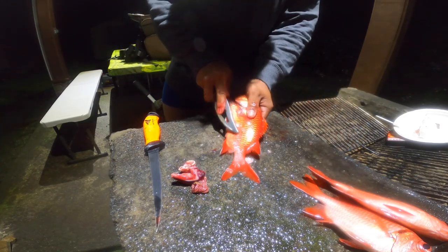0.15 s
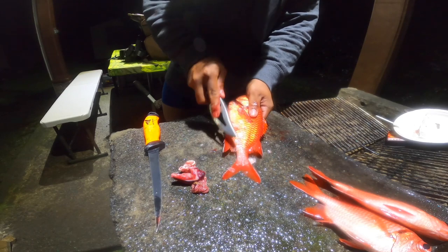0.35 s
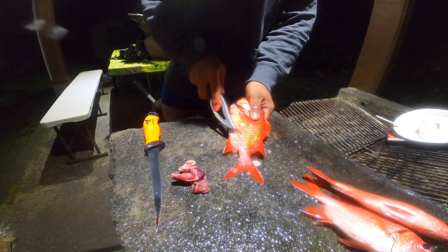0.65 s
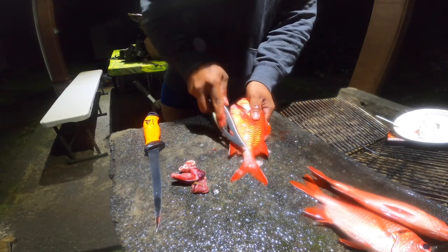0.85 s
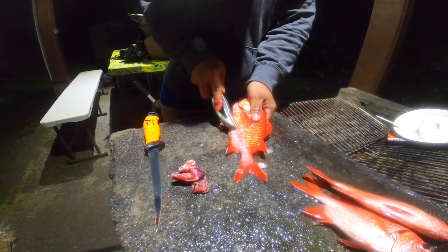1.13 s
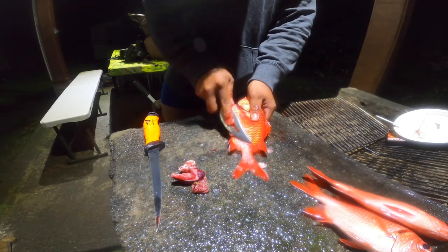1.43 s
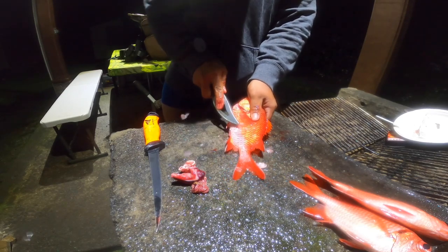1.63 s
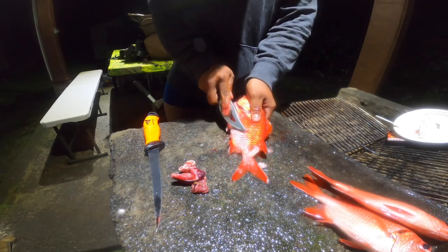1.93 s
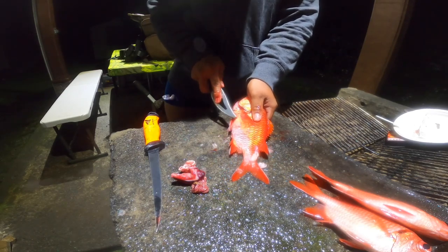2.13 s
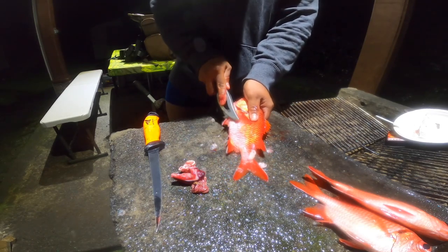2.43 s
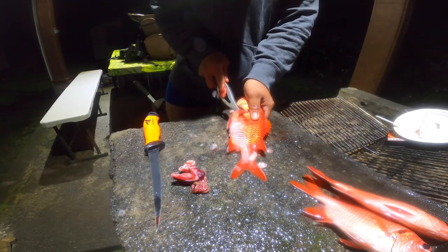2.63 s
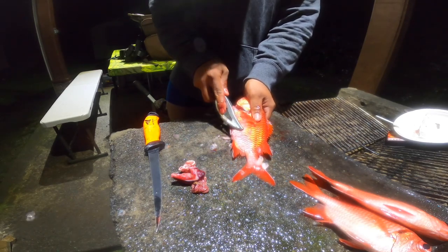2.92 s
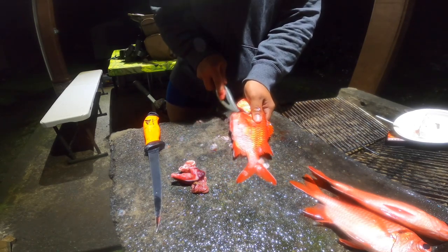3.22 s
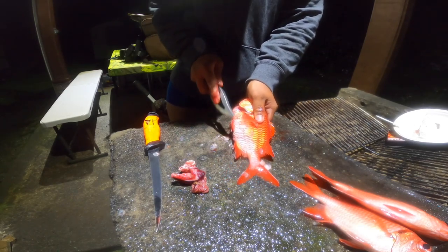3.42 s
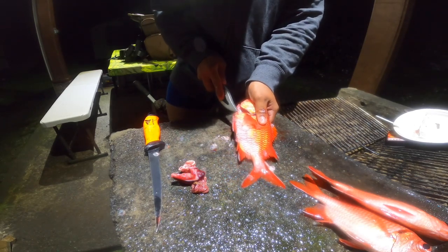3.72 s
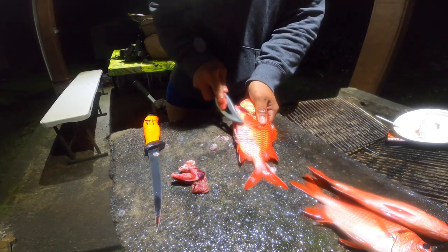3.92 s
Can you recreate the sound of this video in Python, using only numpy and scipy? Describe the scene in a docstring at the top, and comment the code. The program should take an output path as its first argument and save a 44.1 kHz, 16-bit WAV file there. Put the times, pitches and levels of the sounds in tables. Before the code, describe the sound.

Outdoors at night, a fish is scaled right by the microphone: dry, bright, crunchy rasps made of many tiny snaps, with slight blade ring and fleshy thuds. Strokes repeat evenly, densest in the middle, and the last is lighter and thinner. Faint gliding frog peeps and insect hiss sit far behind, and low wind buffeting swells suddenly in the last second.

```python
"""Scaling a fish at night

A steel blade rakes hard scales off a fish on a concrete slab outdoors, close to a microphone with two ports.
Each scale that pops is a noise burst that rings fish, blade, scale and edge as resonators; countless small
slips, as spiky noise through the same modes, rasp under the stroke. Slab and posts echo it briefly.
Far tree frogs whistle gliding sines over a blurred chorus, and gusts rumble as shaped noise."""
import sys
import numpy as np
from scipy import signal
from scipy.fft import rfft, irfft, next_fast_len
from scipy.io import wavfile
from scipy.ndimage import uniform_filter1d, map_coordinates

SR = 44100
rng = np.random.default_rng(int(sys.argv[2]) if len(sys.argv) > 2 else 0)


def invert_db(level):
    """Linear amplitude ratio for a level in decibels (20 dB per decade), elementwise."""
    return 10 ** (np.asarray(level, dtype=float) / 20)


def to_wav(sig):
    """Store sig (one row per channel, or 1-D mono) as 16-bit WAV at the path in sys.argv[1].

    Samples outside -1..1 are clipped; the rate is SR.
    """
    pcm = np.clip(np.atleast_2d(sig), -1, 1) * 32767
    pcm = np.round(pcm).astype(np.int16)
    wavfile.write(sys.argv[1], SR, pcm.T)  # frames by channels


N = 179237  # samples


def unit(x):
    """Normalisation: scales x to rms 1."""
    return x / np.sqrt(np.mean(x ** 2) + 1e-20)


def along(points, hz):
    """Interpolation of (f, value) points on a logarithmic frequency axis."""
    f, v = np.transpose(points)
    return np.interp(np.log(hz + 1), np.log(f + 1), v)


def curves(rows):
    """Linear interpolation in time: one value per sample for each column after t."""
    s, *columns = np.transpose(rows)
    return [np.interp(np.arange(N) / SR, s, column) for column in columns]


def wobble(rate):
    """Slow random modulation: a smooth curve through rate random knots a second."""
    knots = rng.standard_normal(int(N * rate / SR) + 4)
    return map_coordinates(knots, [np.arange(N) * rate / SR])


def filtered(x, response):
    """Linear filtering: the spectrum of x times a complex response of frequency."""
    m = next_fast_len(N + SR // 2)
    return irfft(rfft(x, m) * response(np.fft.rfftfreq(m, 1 / SR)), m)[..., :N]


def ringing(x, modes):
    """Modal superposition: rows of x drive causal resonances of alternating sign."""
    size = next_fast_len(x.shape[-1] + SR // 20)
    f = np.fft.rfftfreq(size, 1 / SR)
    response = 0
    for k, (centre, width, db) in enumerate(modes):
        resonance = 1j * f * width / (centre * centre - f * f + 1j * f * width)
        response = response + (-1) ** k * invert_db(db) * resonance
    return irfft(rfft(x, size) * response, size)[..., :x.shape[-1]]


def rush(spectrum, alike):
    """Partial coherence: stereo noise of rms 1, its mid and side weighted to give the left-right likeness."""
    turn = lambda hz: np.arccos(np.clip(along(alike, hz), -1, 1)) / 2
    shape = lambda hz: invert_db(along(spectrum, hz)) * [np.cos(turn(hz)), np.sin(turn(hz))]
    mid, side = filtered(rng.standard_normal((2, N)), shape)
    return unit(np.array([mid + side, mid - side]))


def rasp(modes, clumps, spread_db):
    """Stick-slip friction: tiny slips as spiky noise in clumps, ringing one part's modes, at rms 1."""
    spikes = invert_db(spread_db * rng.exponential(size=N)) * rng.standard_normal(N)
    return unit(ringing(spikes * clumps, modes))


def cracks(s, peak_db, modes, rise, fall, snap):
    """Impulsive excitation: noise bursts swell and die over rise and fall (s), with a snap, and ring the modes."""
    t = np.arange(-SR // 200, SR // 25) / SR
    envelope = np.exp(np.where(t < 0, t / rise, -t / fall))
    bursts = rng.standard_normal((len(s), len(t))) * envelope + snap * (t == 0)
    rings = ringing(bursts, modes)
    tops = np.sqrt(uniform_filter1d(rings ** 2, size=48, axis=1).max(axis=1))  # loudest short-time rms
    levelled = rings * (invert_db(peak_db) / tops)[:, None]
    at = np.round((s[:, None] + t) * SR).astype(int).clip(0, N - 1)
    return np.bincount(at.ravel(), levelled.ravel(), N)


# resonances of each part: f/Hz, width/Hz, relative level/dB
BODY = [(344, 280, -4.5), (566, 226, 0)]  # the whole fish on the slab
FLESH = [(933, 1140, 0), (1037, 210, 7), (1298, 168, 4.5)]
BLADE = [(1851, 92, -5.5), (1600, 214, -25.5)]  # lower bending mode
BLADE_UPPER = [(1965, 110, 0), (2200, 200, -7)]  # upper bending mode
OVERTONE = [(3300, 150, -7), (3560, 220, 0)]  # overtone of the blade
SCALE = [(2600, 4500, -8.5), (4200, 2670, -0.5), (5287, 1345, 6), (5670, 696, 6.5), (7200, 600, -16.5)]
EDGE = [(7090, 290, 2), (8930, 1250, 5), (11900, 5300, -10), (13300, 3800, -33)]  # thin edge of the blade
# one table a stroke with its return: t/s, pressure as rasp level/dB, freedom of the blade to ring/dB,
# bite into the flesh/dB; small trims and swings follow in the function
STROKES = [
    [(0, -73, -8, 2), (0.13, -68, 13, 7), (0.164, -46, 12.5, -6.5), (0.216, -40, 15, 1.5),
     (0.293, -40, 5.5, 0.5), (0.338, -46, 9.5, -7), (0.378, -63, 2, 3), (0.45, -70, 10, 14),
     (0.529, -68, 5, -3)],
    [(0.578, -57, 18.5, 0), (0.609, -41.5, 19, -4), (0.704, -31.5, 9, -6), (0.75, -36, 10, -5),
     (0.791, -49, -1, -5), (0.822, -45.5, 13, 9), (0.855, -57.5, 9, 2.5), (0.953, -72.5, -6, -5)],
    [(1.033, -59.5, 11, -8), (1.066, -48, 21, 5), (1.097, -40, 14, 6), (1.166, -40.5, 7, 1),
     (1.226, -38, -1, -2.5), (1.279, -54, -6, 2), (1.415, -72, -3, -1)],
    [(1.509, -63.5, 17.5, -7), (1.53, -45.5, 25, 4.5), (1.564, -42.5, 21.5, -4), (1.604, -36.5, 11.5, 4),
     (1.693, -36.5, 4, 0.5), (1.724, -42, 12, -1.5), (1.769, -56, -6, -16), (1.828, -50, 2.5, -11),
     (1.901, -70.5, 8, 3)],
    [(1.983, -56, 4, -5), (2.005, -47, 16, -14), (2.042, -37, 0, 3), (2.099, -39, 6, 5),
     (2.174, -32, -2, -3), (2.21, -39, 8, 6), (2.245, -47.5, -9, -2), (2.333, -72.5, -13, -0.5)],
    [(2.413, -63, 2, -4), (2.477, -41, 3, 0), (2.521, -42.5, 13, 2.5), (2.547, -37, 8, -6),
     (2.617, -40, -2, 0), (2.673, -39.5, -7, -17), (2.705, -37, -1, -9), (2.764, -43, 15, 11),
     (2.797, -48.5, 1, -4), (2.858, -49.5, -5, -31), (2.908, -66, 5, 7)],
    [(3.078, -56, -2, 1), (3.104, -43.5, 6, -1), (3.186, -39, -2, -9), (3.258, -46, 6, -4),
     (3.291, -40, -12, -10), (3.342, -39.5, 10, -3), (3.395, -53, 11, -1), (3.524, -68.5, -2, 8)],
    [(3.651, -54.5, 9, -6), (3.68, -44.5, 8, -5), (3.702, -37.5, 6, 1), (3.768, -52, 14.5, -6),
     (3.84, -53, 19, -4), (3.866, -57, 13, -13), (3.943, -66, -13, 7), (4.06, -56.5, 5, 6)],
]
# how the blade is held: t/s, upper mode's share of the ring (0-1), overtone over the rasp/dB,
# edge over the rasp/dB (both before their swing with pressure)
GRIP = [(.2, 0, 9.5, 2), (.65, 0, 9.5, -2), (.8, 0.2, -4, 5), (1.1, 0, 11, -1), (1.25, 0.4, -3, -1),
        (1.55, 0.09, 7, -3), (1.7, 0.34, 1.5, 3), (2.03, 0.16, 7.5, 1), (2.2, 0.35, -0.5, 2.5),
        (2.55, 0.07, 5, -1.5), (2.77, 0.67, -1, -3.5), (3.15, 0.13, 2, -1), (3.3, 0.5, 0, 1.5),
        (3.7, 0.1, 0, -2.5), (3.85, 0.66, 7, 9.5)]
# where on the fish the blade works: t/s, usual scale pitch f/Hz, hollow of the belly over firm flesh/dB,
# body on the slab/dB
PLACE = [(.2, 3740, -1, -7), (.33, 3980, 13.5, -11), (.65, 3600, -0.5, -8), (1.15, 4100, 0.5, -14),
         (1.55, 4050, -3, -5), (1.7, 3800, -6.5, -12.5), (2.05, 4550, 3, -5), (2.2, 3800, 1.5, -26),
         (2.55, 4200, -2, -8), (2.76, 4200, -6, -2), (3.1, 4000, -8.5, -13), (3.35, 3630, -6, 0.5),
         (3.7, 4740, 6, -7)]


def rasping(clumps):
    """Friction-driven modes: slips excite every part, weighted by pressure, freedom and bite."""
    press_db, free_db, bite_db = curves(np.concatenate(STROKES))
    upper, overtone_db, edge_db = curves(GRIP)
    upper = np.clip(upper, .02, .98)
    body_db = curves(PLACE)[2]
    firm_db = press_db + 17  # pressure over a firm stroke
    blade = invert_db(press_db + free_db - 2.5)
    parts = ((invert_db(press_db + body_db + 0.94 * bite_db), BODY),  # the body takes most of the bite
             (invert_db(press_db + bite_db - 2.0), FLESH),
             (blade * np.sqrt(1 - upper), BLADE),
             (blade * np.sqrt(upper), BLADE_UPPER),
             (invert_db(press_db + 0.12 * firm_db + overtone_db), OVERTONE),  # pressure favours overtone and edge
             (invert_db(press_db), SCALE),
             (invert_db(press_db + 0.14 * firm_db + edge_db), EDGE))
    return sum(gain * rasp(modes, clumps, spread_db=2.5) for gain, modes in parts)


# scales popping off: t/s, snap level/dB, then over the snap: blade ring/dB, flesh thud/dB, edge sizzle/dB;
# small trims follow in cracking()
POPS = [(0.0844, -33.5, -12, -13, -12.5), (0.1532, -26, -5.5, -24, -11), (0.1669, -25, -10, -23, -19),
        (0.1771, -22.5, -16, -27, -23), (0.1947, -18.5, -1.5, -27, -7), (0.2294, -23, 11.5, -17, -2),
        (0.2662, -28, 10.5, -16, -20), (0.2775, -17, -6, -15, -28), (0.2866, -28, 3, 3, -20),
        (0.2946, -20.5, -3, -3, -17), (0.3028, -33, -14, 2, 8), (0.3094, -39, -9, 13, -2),
        (0.329, -16.5, -19, -4, -6.5), (0.345, -39, 3, 7, -8), (0.4192, -34.5, -17, -18, -7),
        (0.5412, -25.5, -38, -46, -10), (0.5493, -25.5, -29, -39, -12), (0.6012, -15, -12, -33, -10.5),
        (0.6105, -35, 13, -17, -14), (0.6254, -20.5, -14, -22, -21), (0.6338, -19, 2, -22, -19),
        (0.6545, -22, 9.5, -11, -1.5), (0.6626, -26.5, 13, -20, -18), (0.6782, -33, 20, -16, -13),
        (0.6929, -29.5, 18.5, -15, -15), (0.7061, -18, -11, -26, -20), (0.7282, -16, -1, -21, -9),
        (0.7358, -15, -1.5, -32, -3.5), (0.7471, -18.5, -5, -14, -4), (0.7702, -22.5, -6, -16, 0.5),
        (0.8102, -16.5, -6.5, -8, 2.5), (0.9962, -35, -14, -23, -15), (1.0109, -43, -12, -11, -3),
        (1.0634, -32.5, 8.5, -15, -8), (1.0826, -20, -8, -19, 0), (1.0956, -24, 3.5, -2.5, -20),
        (1.1109, -16.5, -2, -25, -23), (1.1247, -27, 12.5, 1.5, -16), (1.1395, -33, -3, 0, -11),
        (1.1483, -18, -3, -12, -37), (1.1556, -12.5, -10, -22, -8), (1.1628, -15.5, -3.5, -18, -8),
        (1.1751, -14, -6, -19, -5), (1.1908, -17, -12, -11.5, -14), (1.2104, -26, -0.5, -10, -9.5),
        (1.226, -13.5, -18, -26, -5), (1.2996, -35, -17, -4.5, -13), (1.3392, -39, -3, -7, -2),
        (1.5273, -31, 14.5, -10, -19), (1.536, -31, 5.5, -7, -15), (1.5547, -33.5, 17.5, -5, -7),
        (1.5689, -17, 6.5, -10, -10), (1.585, -21.5, 4, -11, -2.5), (1.5939, -27.5, 10, -9, 0.5),
        (1.6159, -25, -3, -2, 2.5), (1.6234, -15.5, -12, -14, -13), (1.6457, -22, 3, -17, -14),
        (1.6575, -22, -6, -10.5, -4), (1.6846, -17.5, -3, -5.5, -17), (1.6985, -14.5, -16, -24, -25),
        (1.7147, -22, -18, -24, -8), (1.7291, -17.5, -23, -28, 1.5), (1.8243, -28.5, -21, -11, -7),
        (1.83, -28, -33, -21, -14), (1.9262, -39.5, -9, -20, -2), (1.9925, -34, 11, -10, -7),
        (2.0005, -39, 19.5, -11, -18), (2.0107, -28, 10, -14, -21), (2.0154, -20, 7.5, -9, -1.5),
        (2.0234, -16.5, 3.5, -16, -9), (2.0321, -25, 10.5, -2, -6), (2.0443, -16, 0, -26, -6),
        (2.062, -15, -2.5, -22, -1.5), (2.0783, -17, -15, -19, -15), (2.0861, -22.5, -11, -13, 2),
        (2.0995, -26, -8, 2, -13), (2.1053, -33, -3, 0, -3), (2.1258, -18, 2, 0, -0.5),
        (2.1478, -19, -1, -17, -0.5), (2.1681, -17.5, -0.5, -26, -9), (2.1762, -21, -1, -9, -4),
        (2.1943, -18, -3, -19, -13), (2.2073, -19, 0.5, -9, -6), (2.2201, -19.5, -5, 2.5, -22.5),
        (2.4115, -42, -21, -29.5, -20), (2.4216, -40, -17, -23, -3), (2.4418, -36, -14, -5, -7),
        (2.461, -35, -5, -5, -13), (2.4751, -14, -5, -6, -9), (2.5035, -25, -8, -4, 0),
        (2.5246, -31, -9, -8, 8), (2.5315, -15, -13, -15, -8), (2.5371, -18.5, -13, -11, -15),
        (2.5457, -19, -5, -21, -21), (2.5611, -14.5, -20, -9, -6), (2.5909, -19, -16, -12, -10),
        (2.6003, -16.5, -26, -25, -3), (2.6158, -23, -4, -15, -13), (2.6407, -20, -7, -24, -9),
        (2.651, -17, -13, -22, -10), (2.6564, -18, -8, -11, -10), (2.6613, -12.5, -11, -33, -10),
        (2.6719, -46, -13, -20, -19), (2.6839, -53, -5, -17, 0), (2.6896, -41, -19, -27, -7),
        (2.6991, -22, -13, -7, -2), (2.7059, -15.5, -12, -8.5, -2.5), (2.7532, -30, 0, -7, -24),
        (2.8239, -33, -20, -27, -15), (2.8341, -33, -15, -17, -21), (2.8575, -29.5, -4.5, -23, -8.5),
        (3.0384, -30, -12, -22, -7), (3.086, -22, -26, -34, -23), (3.0973, -22, -3, -4.5, 5),
        (3.1417, -24.5, -5, -1.5, -16), (3.1515, -34, 4, 3, -12), (3.1735, -22, -0.5, -5, -14),
        (3.1893, -11, -13, -16.5, -7), (3.2008, -38, -6, -21, -16), (3.2306, -14, -13, -7.5, -4),
        (3.2422, -24, -4, -17, -18), (3.2773, -19, 1, -17, 5), (3.2885, -15.5, 0, -26, -16),
        (3.2982, -29.5, 9, 3, -5), (3.3075, -16.5, -3, -12, -1), (3.3194, -37, -11, -9, 1),
        (3.3293, -29, 10, 6, 2), (3.3595, -29, -3, -16, -16), (3.3754, -25, -2, -26, -14),
        (3.4137, -31, -19, -28, -12), (3.4489, -29.5, 2.5, -25, -30), (3.4771, -35.5, -16, -20, -5),
        (3.6068, -37.5, -14.5, -23, -7), (3.658, -39.5, -1, -2, 7.5), (3.6668, -29.5, -11, -8.5, 6.5),
        (3.6739, -24.5, 3.5, -4, -5), (3.6842, -28, -5, -13, 3.5), (3.6938, -20, 3, -10, 3),
        (3.7199, -24.5, -7, -16, -8), (3.7272, -29.5, 2, -12, 7), (3.7334, -37, 12, -6, 12),
        (3.7439, -30, 5, -8, 7.5), (3.7537, -42, 3, 3, 7), (3.7642, -33, 17, 4.5, 12.5),
        (3.7947, -18, 1, -30, -6), (3.8415, -43.5, 17, -9, -7), (3.894, -22, -16, -43, -49),
        (3.9101, -36.5, -6.5, -35, -9), (4.0308, -42, -6, -9, -18), (4.063, -30.5, -17, -13, -10)]
# small pops, a row each for ring, thud and sizzle: mean over the snap/dB, scatter/dB
SMALL_COLOUR = [(-11, 11.5), (-11, 11), (-13, 7)]
SMALL_POPS, SMALL_DB, SMALL_SPREAD_DB = 80, 6, 4.5  # how many, mean snap over the pressure, scatter
SCALE_SIZES = 0.094  # log spread of scale pitch


def pops():
    """Weighted random process: small pops crowd where pressure is high, beside the listed ones; each has a pitch."""
    press_db = curves(np.concatenate(STROKES))[0]
    crowd = np.cumsum(invert_db(.5 * press_db))
    chance = rng.standard_normal((SMALL_POPS, 4))
    mean_db, scatter_db = np.transpose(SMALL_COLOUR)
    at = np.searchsorted(crowd, crowd[-1] * rng.uniform(size=SMALL_POPS)).clip(0, N - 1)
    size_db = press_db[at] + SMALL_DB + SMALL_SPREAD_DB * chance[:, 0]
    small = np.column_stack([at / SR, size_db, mean_db + scatter_db * chance[:, 1:]])
    rows = np.vstack([POPS, small])
    usual_hz = np.interp(rows[:, 0], *np.transpose(PLACE)[:2])
    pitch_hz = usual_hz * np.exp(SCALE_SIZES * rng.standard_normal(len(rows)))
    return np.column_stack([rows, pitch_hz])


def cracking(popped):
    """Impulse response of coupled parts: each pop strikes flesh, both blade modes, scale and edge."""
    s, scale, ring, thud, sizzle, scale_hz = np.transpose(popped)
    s = s - .0006  # the burst's centre, this many s ahead of the listed time
    at = (s * SR).astype(int).clip(0, N - 1)
    share = np.clip(curves(GRIP)[0], .02, .98)[at]  # the grip shifts the ring between two bending modes
    hollow_db = curves(PLACE)[1][at, None]
    flesh = [(hz, width, db + side * hollow_db) for (hz, width, db), side in zip(FLESH, (0, .5, -.5))]
    lower_db = scale + ring - 1.2 + 10 * np.log10(1 - share)
    upper_db = scale + ring - 1.3 + 10 * np.log10(share)
    own = [(scale_hz[:, None], 500, 7)]  # every scale adds a pitch of its own
    out = cracks(s, scale + thud - 1.1, BODY + flesh, rise=0.0013, fall=0.0012, snap=0.93)
    out += cracks(s, lower_db, BLADE, rise=0.0016, fall=0.0019, snap=8.1)
    out += cracks(s, upper_db, BLADE_UPPER, rise=0.00086, fall=0.002, snap=1.74)
    out += cracks(s, scale - 1.4, own + SCALE, rise=0.00072, fall=0.0012, snap=1.95)
    return out + cracks(s, scale + sizzle - .8, EDGE, rise=0.00011, fall=0.00077, snap=1.6)


PORTS = [(300, -0.5), (1300, -1.5), (2400, 1.5), (4400, 0), (8100, -5.5), (15000, -13)]  # level balance of the ports: f/Hz, left over right/dB
DIRECT = [(2000, .99), (3000, .9), (5500, .78), (9500, .75), (13500, .4)]  # likeness of the ports: f/Hz, left-right likeness (0-1)
LAG = [(300, 0.053), (1500, 0.54), (2700, 0.93), (5200, 0.63), (6500, 1.67), (9000, 1.32), (11600, 0.75),
       (14000, 1.5)]  # phase between the ports: f/Hz, left behind right/rad
SHIFT = [(0, 0.77), (.7, 0.85), (1.15, 0.43), (1.6, 0.33), (2.1, 0.59), (2.6, 0.47), (3.2, 0.51),
         (3.6, 0.05), (4.06, 1)]  # drift of that phase: t/s, added lag of the left treble/rad


def at_ports(work, scattered):
    """Interaural-like differences: work from the right reaches the left later, duller, partly by hands and slab."""
    half = lambda hz: invert_db(along(PORTS, hz) / 2) * np.exp(-.5j * along(LAG, hz))
    left = filtered(work, lambda hz: half(hz) * along(DIRECT, hz))
    left += filtered(scattered, lambda hz: half(hz) * np.sqrt(1 - along(DIRECT, hz) ** 2))
    treble = filtered(left, lambda hz: 1 / (1 + (7000 / (hz + 1)) ** 8))
    # the hand's place changes the path
    shifted = np.real(signal.hilbert(treble) * np.exp(-1j * curves(SHIFT)[0]))
    left += shifted - treble
    return np.array([left, filtered(work, lambda hz: 1 / half(hz))])


YARD = [(300, 0.037), (2000, 0.27), (5000, 0.099), (12000, 0.021)]  # decay of the yard: f/Hz, t60/s


def yard(x):
    """Reverberation: exponentially decaying noise, different at each port, after 60 samples' delay."""
    hz, t, z = signal.stft(rng.standard_normal((2, SR // 4)), SR, nperseg=256)
    decay = invert_db(-60 * t / along(YARD, hz)[:, None])
    tail = signal.istft(z * decay, SR, nperseg=256)[1]
    tail = tail / np.linalg.norm(tail[0])
    return signal.fftconvolve(np.pad(x, (60, 0))[None], tail, axes=1)[:, :N]


ECHO = [(600, -5.5), (1800, -22.5), (5000, -9.5), (12000, -10.5)]  # colour of the answer: f/Hz, level against the direct sound/dB


def echo(work):
    """Coloured reflection: slab and posts answer the work briefly."""
    return filtered(yard(work), lambda hz: invert_db(along(ECHO, hz)))


# whistled notes: t/s, length/s, first f/Hz, last f/Hz, starting rms level/dB before wavering
LOW_NOTES = [(.05, .13, 1490, 1425, -50), (1.37, .11, 1465, 1446, -63), (1.45, .06, 1540, 1555, -61),
             (2.87, .17, 1500, 1425, -45), (3.47, .1, 1607, 1555, -60), (3.57, .07, 1544, 1480, -61),
             (3.94, .12, 1520, 1500, -62)]
HIGH_NOTES = [(.33, .2, 2130, 2850, -60), (.93, .07, 2440, 2570, -66), (1.37, .14, 2500, 2850, -62),
              (1.75, .08, 2770, 2840, -63), (1.86, .11, 2660, 2740, -65), (3.39, .1, 2840, 2990, -59),
              (3.75, .165, 2330, 2810, -51), (3.91, .1, 2620, 2820, -55)]


def frogs(notes, bend, fade_db_per_s, waver_db, smear):
    """Frequency modulation: notes glide fast at first, settle and fade; distance makes them waver."""
    out, t = np.zeros((2, N)), np.arange(N) / SR
    for s, length, first_hz, last_hz, db in notes:
        done = np.clip((t - s) / length, 0, 1)
        ends = np.clip(np.minimum(t - s, s + length - t) / .012, 0, 1)  # 12 ms ramps
        hz = last_hz + (first_hz - last_hz) * (1 - done) ** bend
        phase = 2 * np.pi * np.cumsum(hz) / SR + smear * wobble(90)
        level = invert_db(db - fade_db_per_s * (t - s) * (ends > 0) + waver_db * wobble(41))
        out += np.sqrt(2) * ends * level * np.sin(phase + [[.3], [-.3]])
    return out


# calm, then a sudden gust: t/s, strength/dB, deep buffeting over it/dB, sharper rumble over it/dB
WIND = [
    [(0.0, -61, 7, 7), (0.03, -52.5, -1, -6), (0.95, -63, 7, 8.5), (1.16, -53, -3, -2.5),
     (1.29, -69, 17, 5), (1.44, -44.5, -0.5, -21), (1.58, -47, -8, 1), (1.98, -54.5, 5.5, -10.5),
     (2.03, -56.5, -5, 10), (2.47, -53.5, -1, -7.5), (3.23, -63, 12, -3)],
    [(3.255, -38.5, -14, 6.5), (3.357, -30.5, -17, -2), (3.383, -36, 3, 3.5), (3.419, -34, -13, -4.5),
     (3.513, -47.5, -1, 4), (3.525, -43, -1, -5), (3.771, -36.5, -8, -10), (3.795, -38, -13, -2),
     (3.985, -42, -1, -13.5), (4.023, -46, 3, -5), (4.06, -42, -26, -5)],
]
# noise spectra of the wind: f/Hz, relative level/dB
BUFFET = [(12, -22), (22, -11), (55, -9), (80, -24), (130, -68.5)]
THRUM = [(50, -22), (80, -4), (115, -0.5), (150, -6.5), (220, -57)]
RUMBLE = [(100, -37), (160, 1), (200, 2), (260, -4.5), (320, -7.5), (450, -21), (650, -28), (1000, -95)]


def wind():
    """Turbulent pressure noise: gusts rumble alike in both ports; the deepest buffeting differs between them."""
    strength_db, deep_db, sharp_db = curves(np.concatenate(WIND))
    lumps = wobble(26)
    buffet = invert_db(strength_db + deep_db + 5 + 2.5 * wobble(9)) * rush(BUFFET, [(30, .45), (90, .8)])
    thrum = invert_db(strength_db + 2.3 * wobble(12) + 0.91 * lumps) * rush(THRUM, [(100, 0.95)])
    # still air sets a floor of -58 dB under the gusts' rumble
    strength = np.hypot(invert_db(-58), invert_db(strength_db + sharp_db - 0.5))
    rumble = strength * invert_db(2.6 * lumps + 1.34 * wobble(8.02)) * rush(RUMBLE, [(200, 0.91)])
    return buffet + thrum + rumble


NIGHT = [(300, -30), (450, -18), (750, -17), (1200, -21), (1550, -3), (2050, -18.5), (2700, 1.5),
         (3200, -22), (5000, -36), (8100, -18.5), (12000, -66), (16000, -42)]  # spectrum of the chorus: f/Hz, relative level/dB
NIGHT_ALIKE = [(400, 0.27), (1400, 0.5), (3100, 0.37), (7000, 0.085), (15000, 0.11)]  # f/Hz, left-right likeness (0-1)


def night():
    """Superposition of many sources: the blurred chorus of far frogs and insects becomes shaped noise."""
    return invert_db(-61 + 1.3 * wobble(2.8)) * rush(NIGHT, NIGHT_ALIKE)


def scene():
    """Linear superposition: the work at both ports, its echo, the far calls, wind and night."""
    clumps = invert_db(2.45 * wobble(150) + 1.28 * wobble(40))
    popped = pops()
    work = rasping(clumps) + cracking(popped)
    scattered = rasping(clumps) + cracking(popped)  # same events, fresh noise
    near = at_ports(work, scattered)
    calls = frogs(LOW_NOTES, 1.8, 130, waver_db=1, smear=.3)
    calls += frogs(HIGH_NOTES, 2.8, 40, waver_db=3.5, smear=1.5)
    blur = invert_db(-0.5) * yard(calls[0])  # trees smear the far whistles
    return near + echo(work) + calls + blur + wind() + night()


def low_pass(x):
    """Removes everything above the highest recorded frequency."""
    return signal.sosfilt(signal.butter(12, 16640, fs=SR, output="sos"), x)


def record(dry):
    """Soft saturation and low-pass response: the loudest peaks bend and the microphone rolls off at the top."""
    bent = dry / (1 + np.abs(dry / .95) ** 6) ** (1 / 6)
    mix = filtered(bent, lambda hz: 1 / (1 + (hz / 14300) ** 16))  # half amplitude at 14300 Hz
    return low_pass(mix)


dry = scene()
out = record(dry)
to_wav(out)
```